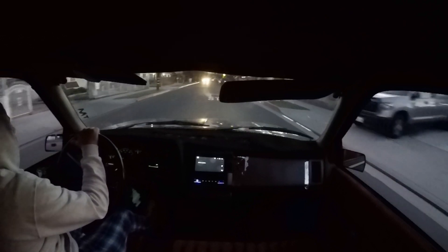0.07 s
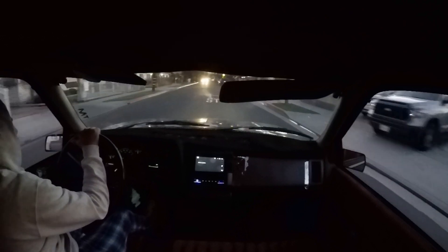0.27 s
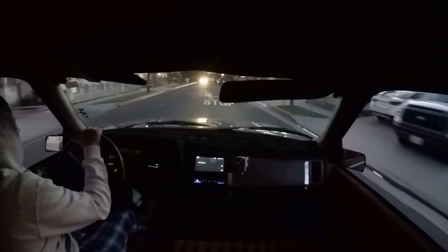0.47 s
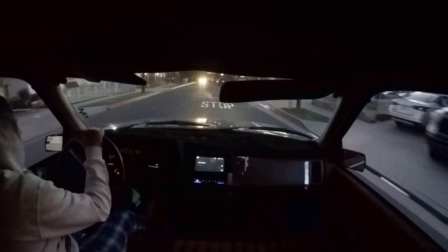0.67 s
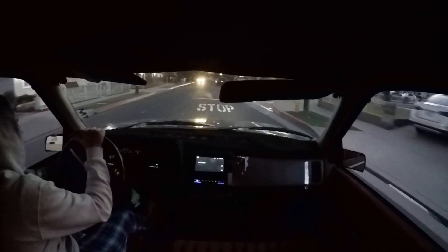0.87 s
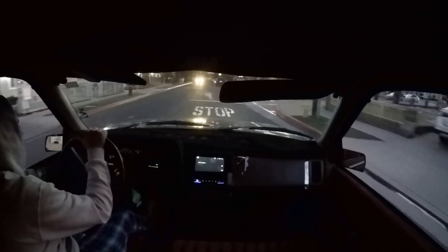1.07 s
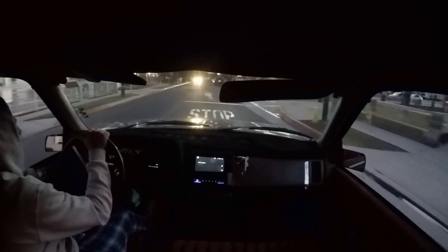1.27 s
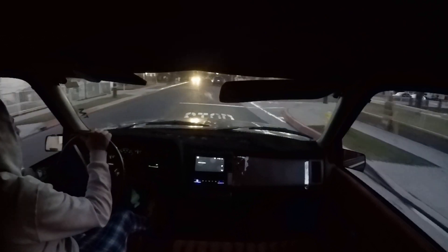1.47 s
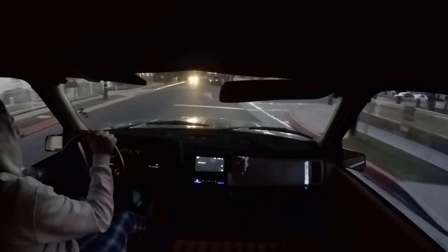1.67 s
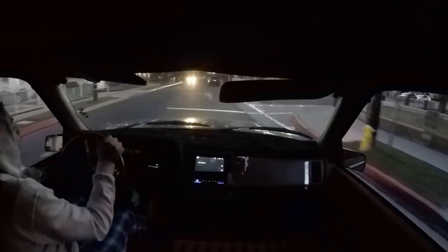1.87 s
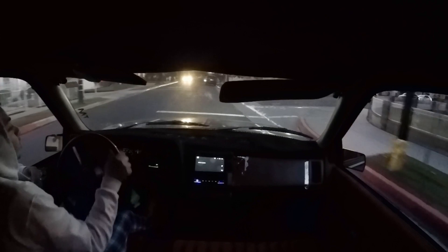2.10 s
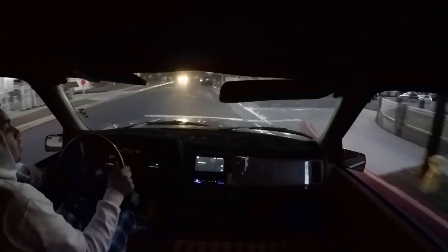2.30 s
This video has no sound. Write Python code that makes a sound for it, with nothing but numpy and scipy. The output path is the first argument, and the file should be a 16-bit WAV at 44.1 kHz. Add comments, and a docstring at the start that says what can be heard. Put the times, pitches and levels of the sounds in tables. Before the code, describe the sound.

Low eight-cylinder engine boom heard from inside a slowing truck, wavering briefly, with faint road noise

```python
"""An eight-cylinder engine booms through the floor of a pickup cab rolling slowly down a street.
Its drone is a stack of wavering near-sines at orders of the engine cycle. The speed sags; the drone
breaks up for half a second as the load changes, then settles. Coloured noise makes the body rumble and
the road roar and hiss from outside. Late on, something in the cab ticks once, a burst of decaying sines,
and a hand slides on the wheel, a swell of band-shaped noise."""
import sys
import numpy as np
from scipy import signal
from scipy.io import wavfile
from scipy.ndimage import uniform_filter1d, minimum_filter1d

SR = 44100
rng = np.random.default_rng(int(sys.argv[2]) if len(sys.argv) > 2 else 0)


def volts_from_decibels(level):
    """Turn decibel levels (scalar or array-like) into linear amplitude factors."""
    exponent = np.asarray(level, float) / 20
    return 10 ** exponent


def transcribe(u):
    """Save the signal u as a 16-bit wav file named by the first command-line argument.

    u: samples, shape (n,) or (channels, n), limited to [-1, 1]; the rate is SR.
    q: integer samples, one column per channel.
    """
    v = np.clip(np.atleast_2d(u).T, -1, 1)
    q = np.round(v * 32767).astype(np.int16)
    wavfile.write(sys.argv[1], SR, q)


N = 103105
TIME = np.arange(N) / SR


def evened(x):
    """Scales to rms 1."""
    return x / np.sqrt(np.mean(np.abs(x) ** 2) + 1e-20)


def curve(rows, column):
    """One column of a table, joined by straight lines in time."""
    rows = np.asarray(rows, float)
    return np.interp(TIME, rows[:, 0], rows[:, column])


def noise(points, size, patchy_db, flicker_db):
    """Random short-time spectra with a given colour, drifting patches and a flicker shared by all bins."""
    frames = N // (size // 4) + 5
    hz = np.fft.rfftfreq(size, 1 / SR)
    real, imaginary, patches = rng.standard_normal((frames, len(hz), 3)).T
    patches = uniform_filter1d(patches, size=9, axis=0)  # smooth across frequency
    patches = evened(uniform_filter1d(patches, size=9, axis=1))  # and across time
    flicker = evened(uniform_filter1d(rng.standard_normal(frames), size=3))
    f, db = np.transpose(points)
    colour_db = np.interp(np.log(hz + 1), np.log(f + 1), db, left=-100, right=-100)[:, None]
    gain = volts_from_decibels(colour_db + patchy_db * patches + flicker_db * flicker)
    spectra = (real + 1j * imaginary) * gain
    sound = signal.istft(spectra, nperseg=size, noverlap=size - size // 4)[1]
    return evened(sound[:N])


def waver():
    """Slow complex chance, low-passed twice, that shakes the height and phase of one order."""
    step_s, corner_hz = .005, 6
    steps = np.arange(-1, N / SR + 1, step_s)  # starts early so the filters settle
    a, b = rng.standard_normal((2, len(steps)))
    pole = np.exp(-2 * np.pi * corner_hz * step_s)
    once = signal.lfilter([1], [1, -pole], a + 1j * b)
    slow = evened(signal.lfilter([1], [1, -pole], once))
    return np.interp(TIME, steps, slow.real) + 1j * np.interp(TIME, steps, slow.imag)


# Engine speed as its firing rate: (t/s, f/Hz)
FIRING_RATE = [(0, 77), (.2, 76.2), (.4, 74.7), (.6, 73.6), (.8, 72.7), (1, 71.9), (1.2, 70.6), (1.4, 68.6),
               (1.6, 66.8), (1.75, 67.5), (1.9, 68.3), (2.1, 69.2), (2.33, 69.3)]
# Firing tone, one pulse per cylinder per cycle: (t/s, level/dB)
FIRING_LEVEL = [(0, -9.5), (.2, -15), (.35, -15), (.5, -11.5), (.8, -9.5), (1.2, -9), (1.5, -11.5),
                (1.62, -14), (1.72, -18), (1.9, -20), (2, -15.5), (2.1, -11), (2.33, -9)]
# Engine load: (t/s, lope orders level/dB, upper orders level/dB, unsteadiness 0-1)
ENGINE_LOAD = [(0, -17, -20.5, 0.4), (.3, -15, -31, 0.02), (.7, -15.5, -29, .12), (1.2, -18, -31, 0.2),
               (1.45, -19, -32, 0.1), (1.58, -23, -26.5, 0.64), (1.68, -15.5, -23, 0.72),
               (1.83, -18, -16.5, 0.65), (1.95, -22.5, -17, 0.77), (2.1, -26.5, -25, 0.38),
               (2.32, -20.5, -28.5, 0.3)]
# Lope of uneven firing, below and around the firing tone: {order of the engine cycle: relative level/dB}
LOPE_ORDERS = {3: -24, 4: -20, 5: -1.5, 7: -12, 9: -18, 10: -2.5, 11: -11, 12: -19, 13: -20}
# Order 6, which swells on its own: (t/s, level/dB)
SIXTH_LEVEL = [(0, -16.5), (.15, -17.5), (.35, -21), (.9, -24.5), (1.25, -20.5), (1.45, -26), (1.62, -18),
               (1.75, -25.5), (1.9, -27), (2.05, -28.5), (2.33, -13)]
# Orders around twice the firing tone and above: {order: relative level/dB}
UPPER_ORDERS = {14: -7, 15: -1, 16: -1, 17: -12, 18: -16, 19: -13}
# Faint high buzz: {order: relative level/dB}
BUZZ_ORDERS = {20: -5, 22: -11, 24: -0.5, 25: -2.3, 26: -9.5, 30: -4.5, 31: -6, 34: -8, 35: -6}
# Swell of the buzz: (t/s, level/dB)
BUZZ_SWELL = [(0, -42.5), (.4, -39.5), (.9, -43.5), (1.3, -52.5), (1.8, -44), (2.33, -46)]


def engine():
    """Orders of the engine cycle as near-sines; each wavers more when combustion is unsteady."""
    cylinders, firing_waver = 8, .6
    cycle = 2 * np.pi * np.cumsum(curve(FIRING_RATE, 1)) / SR / cylinders  # phase in radians
    loose = np.clip(curve(ENGINE_LOAD, 3), 0, 1)
    buzz_loose = np.clip(2 * loose, 0, 1)

    def order(k, share):
        """One order; share trades its steady part for waver at equal power."""
        turning = np.exp(1j * (k * cycle + 2 * np.pi * rng.random()))
        shaken = turning * (np.sqrt(1 - share ** 2) + share * waver())
        return np.sqrt(2) * shaken.real

    def stack(orders, share):
        """A table of orders summed at their relative levels."""
        return sum(volts_from_decibels(db) * order(k, share) for k, db in orders.items())

    firing = volts_from_decibels(curve(FIRING_LEVEL, 1)) * order(cylinders, np.clip(firing_waver * loose, 0, 1))
    lope = volts_from_decibels(curve(ENGINE_LOAD, 1)) * stack(LOPE_ORDERS, loose)
    sixth = volts_from_decibels(curve(SIXTH_LEVEL, 1)) * order(6, loose)
    buzz = volts_from_decibels(curve(BUZZ_SWELL, 1)) * stack(BUZZ_ORDERS, buzz_loose)
    upper = volts_from_decibels(curve(ENGINE_LOAD, 2)) * stack(UPPER_ORDERS, loose)
    return firing + lope + sixth + buzz + upper


# Colour of the body shake: (f/Hz, relative level per Hz/dB)
RUMBLE_COLOUR = [(20, -19), (35, -11.5), (50, -2), (90, -2.5), (140, -9), (180, -25.5), (260, -46)]
# Swell of the body shake: (t/s, level/dB)
RUMBLE_SWELL = [(0, -25.5), (.4, -26), (1, -35.5), (1.45, -33), (1.7, -23.5), (2, -7), (2.32, -38)]


def body_rumble():
    """The shaking body heard as low noise that swells and sinks."""
    return volts_from_decibels(curve(RUMBLE_SWELL, 1)) * noise(RUMBLE_COLOUR, size=4096, patchy_db=4.0, flicker_db=1.46)


# Colour of the tyre roar: (f/Hz, relative level per Hz/dB)
ROAR_COLOUR = [(100, -33.5), (170, -6), (226, -1.5), (253, -9), (322, -6), (345, -10), (776, -15.5),
               (900, -19.5), (1010, -19.5), (1250, -25.5), (2600, -40.5), (3380, -69), (5720, -120)]
# Colour of the air hiss: (f/Hz, relative level per Hz/dB)
HISS_COLOUR = [(1060, -31), (1800, -7.5), (2080, -8.5), (2400, -0.5), (2610, -6), (2930, -3.5), (4020, -8),
               (5870, -8), (6900, -15.5), (9210, -10), (10800, -15.5), (13600, -31.5), (15500, -31)]
# Noise from outside, before the fixed gains: (t/s, roar level/dB, hiss level/dB)
OUTSIDE_SWELL = [(0, -38.5, -62.5), (.3, -39.5, -63.5), (.62, -37, -60.5), (.78, -38.5, -63.5),
                 (.92, -41.5, -66), (1.2, -42, -67), (1.47, -45, -69.5), (1.7, -41.5, -67),
                 (1.95, -40, -64), (2.18, -37, -61.5), (2.33, -36.5, -61.5)]


def road():
    """Tyre roar and air hiss: two bands of coloured noise coming in from outside."""
    roar_gain_db, hiss_gain_db = 3, 6
    roar = noise(ROAR_COLOUR, size=1024, patchy_db=0.43, flicker_db=0.23)
    hiss = noise(HISS_COLOUR, size=256, patchy_db=0.9, flicker_db=-0.1)
    roar = volts_from_decibels(curve(OUTSIDE_SWELL, 1) + roar_gain_db) * roar
    hiss = volts_from_decibels(curve(OUTSIDE_SWELL, 2) + hiss_gain_db) * hiss
    return roar + hiss


# Hits on hard plastic: (t/s, peak level/dB)
TICK_HITS = [(2.0133, -37.5)]
# Ringing modes of the plastic: (f/Hz, relative level/dB, time to fall 60 dB t/s)
PLASTIC_MODES = [(3500, -1, .025), (3900, 0, .04), (4400, -2, .03), (4900, -3, .018), (5500, -2, .022),
                 (6100, -1, .018), (6700, 0, .02), (7200, -3, .016), (10600, -12, .02)]


def ticks():
    """A small hard plastic tick: modes struck together, each dying at its own rate."""
    rise_s = .0002
    t = TIME[:2000]
    ring = 0
    for hz, db, t60 in PLASTIC_MODES:
        ring = ring + volts_from_decibels(db - 60 * t / t60) * np.sin(2 * np.pi * (hz * t + rng.random()))
    ring = ring * np.minimum(t / rise_s, 1)
    hits = np.zeros(N)
    for s, db in TICK_HITS:
        hits[round(s * SR)] = volts_from_decibels(db)
    return signal.oaconvolve(hits, ring / np.abs(ring).max())[:N]


# Colour of skin on the wheel rim: (f/Hz, relative level per Hz/dB)
SKIN_COLOUR = [(2200, -26.5), (3200, -9.5), (3900, -4), (4700, -9.5), (5800, -12.5), (7500, -30.5)]


def slide():
    """A short swish of skin on the wheel rim: noise swelling and fading over half a sine."""
    start_s, length_s, level_db = 2.04, 0.29, -53.5
    stroke = np.sin(np.pi * np.clip((TIME - start_s) / length_s, 0, 1))
    return volts_from_decibels(level_db) * stroke * noise(SKIN_COLOUR, size=256, patchy_db=0.7, flicker_db=0.8)


def scene():
    """Everything reaches one microphone in the cab."""
    return (engine() + body_rumble() + road() + ticks() + slide())[None]


def band_limit(x):
    """A steep low-pass at the top of the band."""
    return signal.sosfilt(signal.butter(12, 15690, fs=SR, output="sos"), x)


def record(dry):
    """A soft limiter takes most of the excess off the peaks of the boom."""
    limit_db, share, recover_db_per_s, attack_s = -4.8, .8, 40, .012
    peak_db = 20 * np.log10(np.abs(dry[0]) + 1e-9)
    fall = TIME * recover_db_per_s
    held_db = np.maximum.accumulate(peak_db + fall) - fall  # peaks held, sinking steadily
    over_db = np.maximum(held_db - limit_db, 0)
    span = max(round(attack_s * SR), 1)
    over_db = -minimum_filter1d(-over_db, 2 * span)  # widened so the gain moves ahead of each peak
    over_db = uniform_filter1d(over_db, span)
    mix = dry / volts_from_decibels(share * over_db)
    return band_limit(mix)


dry = scene()
out = record(dry)
transcribe(out)
```